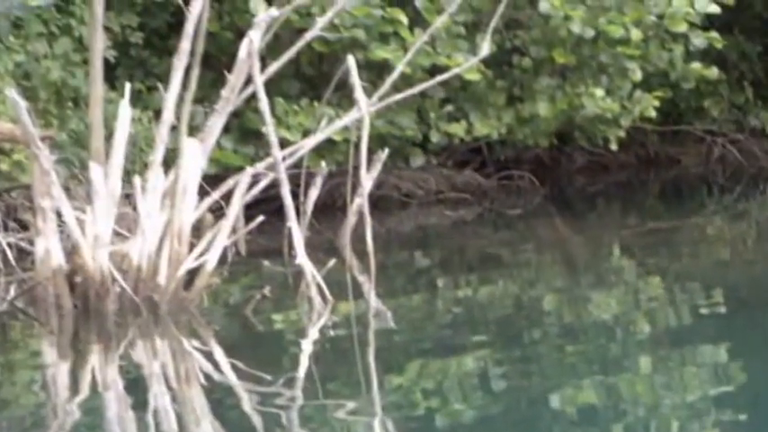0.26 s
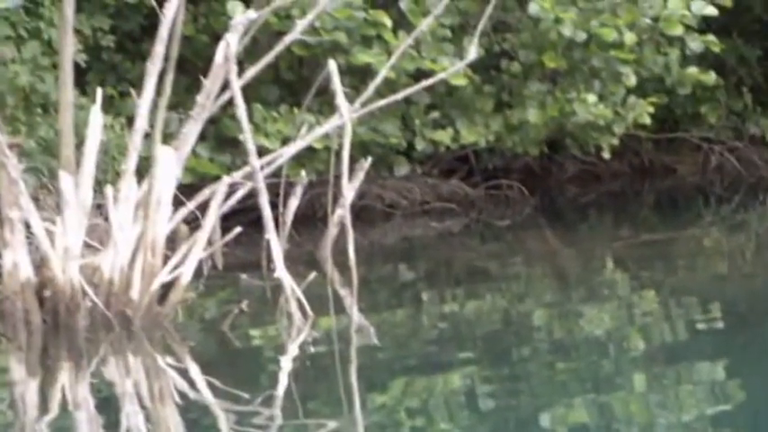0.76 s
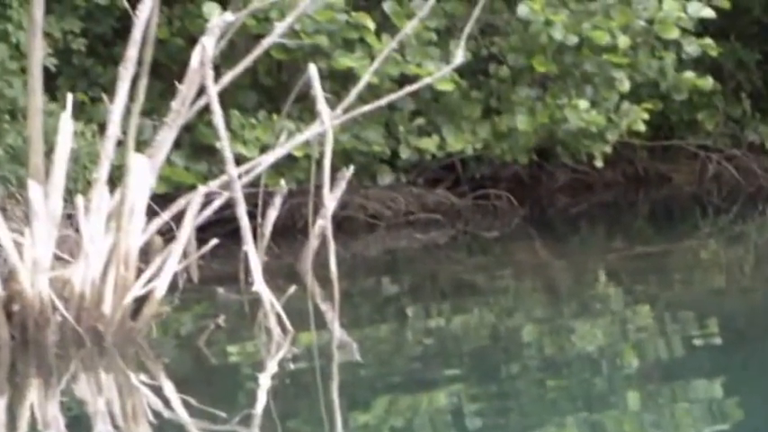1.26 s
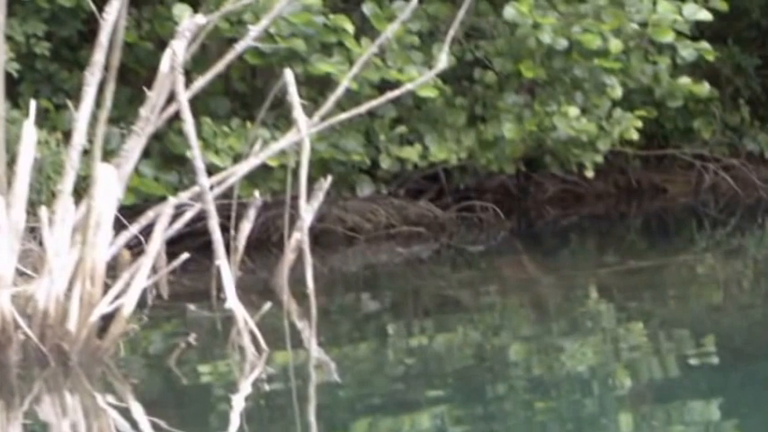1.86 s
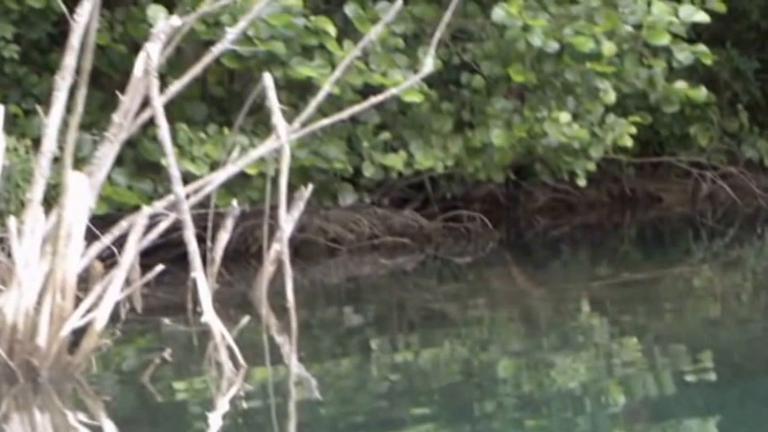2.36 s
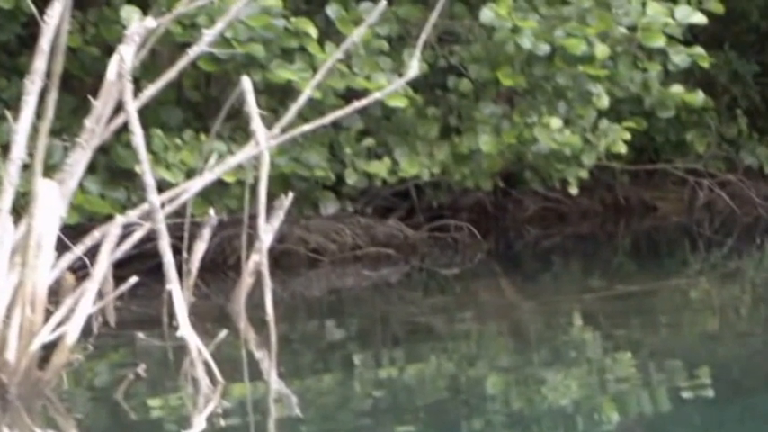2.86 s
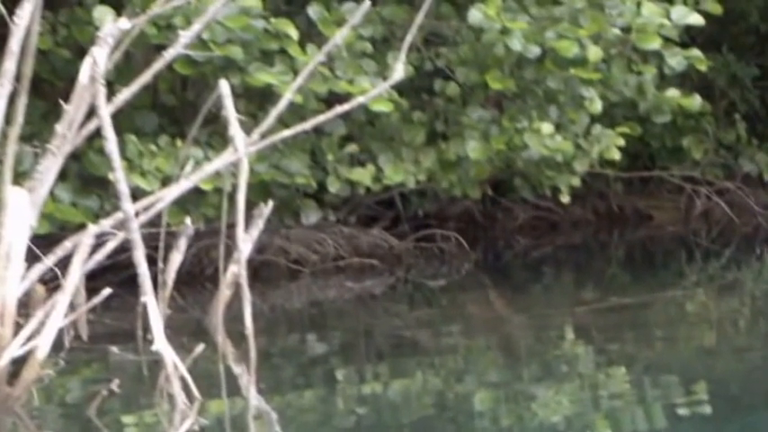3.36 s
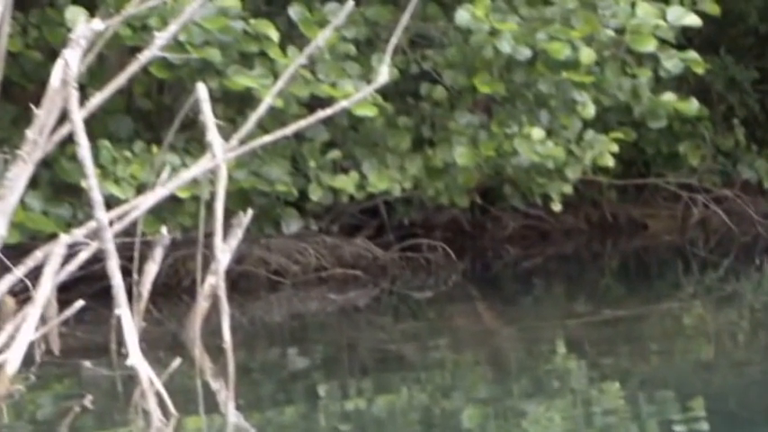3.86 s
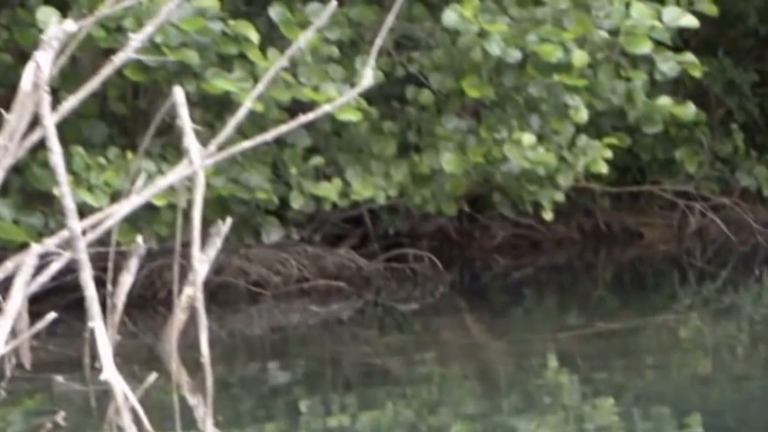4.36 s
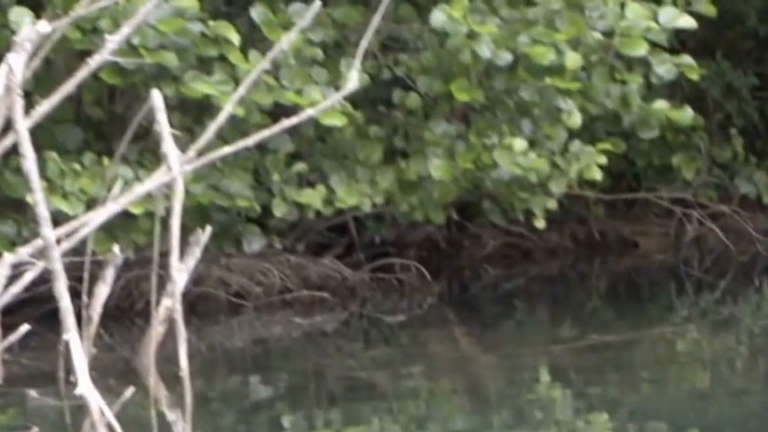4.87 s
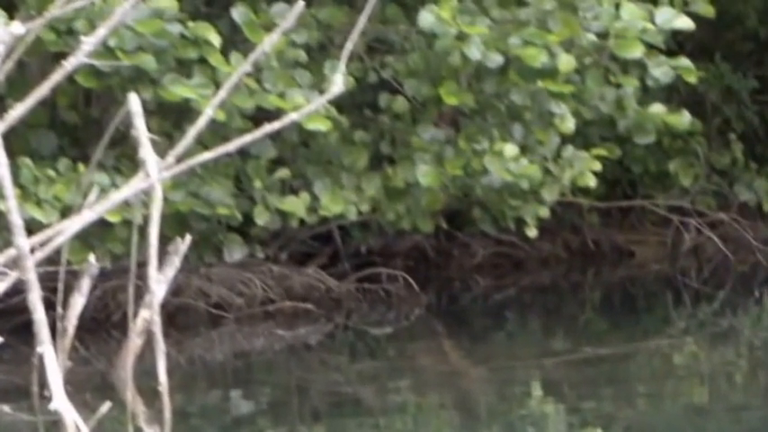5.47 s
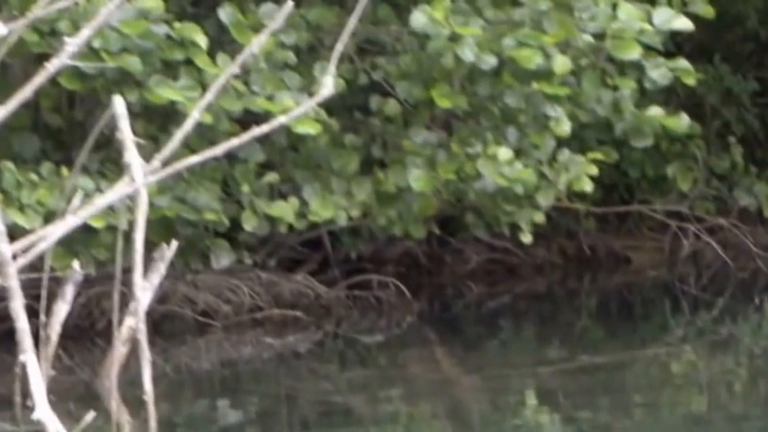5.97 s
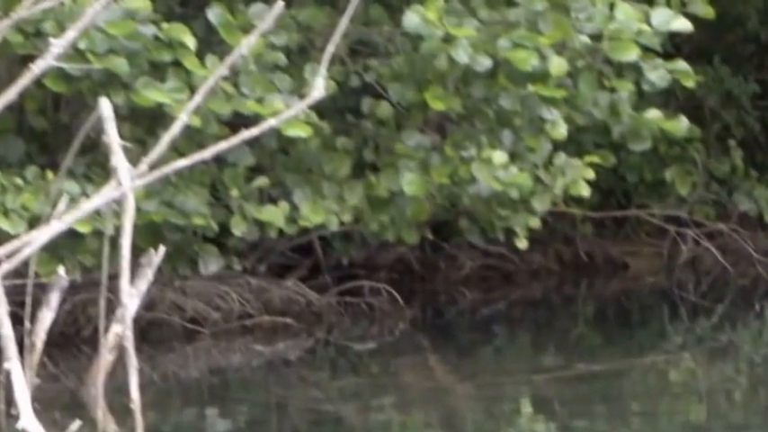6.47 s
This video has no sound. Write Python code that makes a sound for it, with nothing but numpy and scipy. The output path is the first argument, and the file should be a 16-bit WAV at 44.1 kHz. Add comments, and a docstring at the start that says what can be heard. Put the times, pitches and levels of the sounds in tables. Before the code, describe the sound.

Dry, pulsing frog trills over a farther chorus, joined by a loud bird whistle and then quick high twittering.

```python
"""Frogs trill on a calm wooded pond: runs of dry pulses, most swelling as they slow, over a farther chorus.
Each pulse is a snap of the larynx that excites damped resonances of the throat and the vocal sac.
Birds add the gliding tones of the syrinx: some flute far off, a near songbird whistles one loud phrase,
and a high-voiced bird calls, then repeats a twittered motif. The trees on the bank scatter the birds
and the near frogs back across the water; under it all lie quiet air and a faint hiss of leaves."""
import sys
import numpy as np
from scipy import signal
from scipy.fft import rfft, irfft, next_fast_len
from scipy.io import wavfile
from scipy.ndimage import uniform_filter1d, map_coordinates

SR = 44100
rng = np.random.default_rng(int(sys.argv[2]) if len(sys.argv) > 2 else 0)


def log_audio(samples):
    """Write samples as a 16-bit WAV file to the path given in sys.argv[1]."""
    # one column per channel
    frames = np.atleast_2d(samples).T
    # limit to full scale, then quantise
    limited = np.clip(frames, -1, 1)
    pcm = np.round(limited * 32767).astype(np.int16)
    wavfile.write(sys.argv[1], SR, pcm)


N = 296793
THROAT_GROWTH, SAC_GROWTH = 1.55, 1.0  # a longer gap builds a stronger pulse: dB of level per dB of gap
PULSE_SCATTER_DB, PULSE_SCATTER_HZ = 1.15, 35  # standard deviations from pulse to pulse


def amp(db):
    """Amplitude ratio of a level in decibels."""
    return 10 ** (np.asarray(db) / 20)


def along(points, hz):
    """Interpolation of (f/Hz, value) points on a logarithmic frequency axis."""
    f, value = np.transpose(points)
    return np.interp(np.log(hz + 1), np.log(f + 1), value)


def filtered(x, response):
    """Linear filtering: the spectrum is multiplied by a frequency response."""
    size = next_fast_len(N + 8192)
    return irfft(rfft(x, size) * response(np.fft.rfftfreq(size, 1 / SR)), size)[..., :N]


def wobble(rate, size=N):
    """Slow random modulation: a spline through `rate` Gaussian knots a second."""
    knots = rng.standard_normal(int(size * rate / SR) + 4)
    return map_coordinates(knots, [np.arange(size) * rate / SR])


def panned(pan_db):
    """Interaural level difference: left and right gains whose mean is 1."""
    gains = amp([[pan_db / 2], [-pan_db / 2]])
    return gains / gains.mean()


def add(track, s, sound):
    """Superposition: a stereo sound joins the track at s seconds."""
    i = round(s * SR)
    part = sound[:, max(-i, 0):max(N - i, 0)]
    track[:, max(i, 0):max(i, 0) + part.shape[1]] += part


def scattered(sound, wet_db, t60, onset_s, width):
    """Diffuse reflection: bank and trees follow the direct sound with an exponentially decaying tail."""
    t = np.arange(SR // 3) / SR
    build_up = 1 - np.exp(-(t / onset_s) ** 2)
    mid, side = rng.standard_normal((2, len(t))) * amp(-60 * t / t60) * build_up
    response = np.array([mid + width * side, mid - width * side])
    response *= amp(wet_db) / np.linalg.norm(response[0])
    response[:, 0] += 1  # direct path
    return signal.fftconvolve(sound[None], response, axes=1)


def diffuse_noise(spectrum):
    """Partly coherent stereo noise of rms 1, most alike at the two ears in the midrange."""
    # interaural coherence: f/Hz, correlation
    coherence = [(30, .25), (130, .45), (300, .9), (1400, .9), (2800, .6), (4500, .35), (8000, 0)]

    def response(hz):
        angle = np.arccos(np.clip(along(coherence, hz), -1, 1)) / 2
        return amp(along(spectrum, hz)) * [np.cos(angle), np.sin(angle)]

    mid, side = filtered(rng.standard_normal((2, N)), response)
    ears = np.array([mid + side, mid - side])
    return ears / np.sqrt(np.mean(ears ** 2) + 1e-20)


def air_and_leaves():
    """Ambient noise: steady broadband air and a slowly varying treble band from the leaves."""
    # spectra of open air and of leaf hiss: f/Hz, relative level/dB
    air_spectrum = [(20, 7.5), (45, -16), (65, -14.5), (110, -23.5), (250, -18.5), (450, -5.5), (850, -6.5),
                    (2000, -3.5), (4500, -18), (7000, -14.5), (10000, -17.5), (12000, -26.5)]
    leaf_spectrum = [(2500, -23), (3700, -3.5), (4600, -2), (5500, -6), (7000, -24)]
    # envelope of the hiss: t/s, level/dB
    leaf_envelope = [(0, -73), (.8, -65.5), (1.4, -64.5), (2.599, -65), (3.399, -72), (6.699, -69)]
    leaf_db = np.interp(np.arange(N) / SR, *np.transpose(leaf_envelope))
    leaves = amp(leaf_db) * diffuse_noise(leaf_spectrum)
    air = amp(-61.5) * diffuse_noise(air_spectrum)
    return (air + leaves) * panned(-2.4)


def syrinx(contour, buzz_db, waver, second_db, second_hz=6200, buzz_hz=165):
    """A tone along (t/s, f/Hz, level/dB) points; amplitude and frequency modulation roughen fast glides."""
    s, hz, db = np.transpose(contour)
    s = np.sort(s)
    t = np.arange(s[0], s[-1] + .00067, 1 / SR)
    pitch = uniform_filter1d(np.interp(t, s, hz), size=130)
    glide = np.gradient(np.log(pitch)) * SR
    rough = np.minimum((glide / 6) ** 2, 1)
    buzz = rough * (np.sin(2 * np.pi * buzz_hz * t + wobble(60, len(t))) + .5 * wobble(400, len(t)))
    pitch = pitch * (1 + waver * buzz)
    edges = np.sin(np.pi / 2 * np.clip(np.minimum(t - t[0], t[-1] - t) / .0015, 0, 1)) ** 2
    envelope = amp(uniform_filter1d(np.interp(t, s, db), size=90) + buzz_db * (buzz - rough / 2))
    # on high upward slurs the other side of the syrinx joins in, a little higher
    joins = np.exp(-((pitch - 5350) / 480) ** 2) * np.clip(glide, 0, 1)
    upper = second_hz + .8 * (pitch - 5350) + 130 * wobble(490, len(t))
    tone = lambda f: np.sin(2 * np.pi * np.cumsum(f) / SR)
    return edges * envelope * (tone(pitch) + amp(second_db) * joins * tone(upper))


def whistles(rows, attack_share=.12, release_share=.15, arch_db=2.5):
    """Note contours: a parabolic glide under an arched envelope; modulation makes high notes flutter."""
    flutter_from_hz, flutter_hz, flutter_db, flutter_bend = 3300, 55, .5, .008
    u = np.linspace(0, 1, 80)
    for s, length, *arc_hz, db, fade_db, pan_db in rows:
        hz = np.polyval(np.polyfit([0, .5, 1], arc_hz, 2), u)
        gate = np.clip(np.minimum(u / attack_share, np.sqrt((1 - u) / release_share)), .1, 1)
        depth = np.clip((hz - flutter_from_hz) / flutter_from_hz * 10, 0, 1)
        flutter = depth * np.sin(2 * np.pi * flutter_hz * u * length)
        level = db - fade_db * u - arch_db * (2 * u - 1) ** 2 + flutter_db * flutter + 20 * np.log10(gate)
        yield pan_db, np.transpose([s + u * length, hz * (1 + flutter_bend * flutter), level])


def bird(notes, gain_db, wet_db, t60, buzz_db=0, waver=0, second_db=-120):
    """A source among scatterers: each note arrives directly and by way of the trees."""
    out = np.zeros((2, N))
    for pan_db, contour in notes:
        whistle = amp(gain_db) * syrinx(contour, buzz_db, waver, second_db)
        heard = scattered(whistle, wet_db, t60, onset_s=.011, width=1.1)
        add(out, contour[0][0], panned(pan_db) * heard)
    return out


def far_birds():
    """Faint fluted notes: at a distance, scattered sound is a large share of what arrives."""
    # notes: t/s, length/s, first f/Hz, middle f/Hz, last f/Hz, relative level/dB, fade/dB, L-R/dB
    notes = [ (.614, 0.015, 2180, 2220, 2330, -52, -2, -2), (.845, 0.031, 2420, 2210, 2040, -50, 4, -2),
             (.885, 0.024, 1660, 1660, 1640, -51.5, -3, -2), (.925, 0.033, 1787, 1721, 1680, -47, 4, -7),
             (1.13, 0.03, 2600, 2360, 2150, -46.5, 3, -6), (1.2, 0.11, 2180, 1970, 1900, -48.5, 8, -8),
             (1.302, .15, 2340, 2116, 1975, -45.5, 13, -6), (1.635, 0.032, 2072, 2040, 2050, -51, 8, -4),
             (2.09, .07, 2100, 2040, 1990, -56.5, 5, -1), (2.98, 0.0911, 4700, 4760, 4706, -56, 12, 7),
             (4.04, .11, 2245, 2090, 1880, -49, 6, 0), (6.655, 0.073, 1715, 1660, 1600, -53, -5, 0)]
    return bird(whistles(notes), gain_db=4, wet_db=-6, t60=.21)


def damped_mode(t, hz, life_s, sag, order=3):
    """A damped resonance whose envelope peaks at t = 0 while its pitch sags through hz."""
    u = np.maximum(1 + t / (order * life_s), 0)
    cycles = hz * (t - sag * life_s * np.sqrt(1 + (t / life_s) ** 2))
    return (u * np.exp(1 - u)) ** order * np.sin(2 * np.pi * (cycles + rng.random()))


def frog_pulse(throat_db, sac_db, sac_hz, throat_hz=1390, snap_db=-28, overtone_db=-27):
    """Impulse excitation: one snap of the larynx rings throat and vocal sac, peaking 10 ms in."""
    t = np.arange(-(SR // 100), SR // 60) / SR
    drift = np.exp(.02 * rng.standard_normal(3))
    throat = amp(throat_db) * damped_mode(t, throat_hz * drift[0], life_s=.00077, sag=.05)
    sac = damped_mode(t, sac_hz, life_s=.00088 * drift[1] ** 8, sag=.025)
    overtone = amp(overtone_db) * damped_mode(t, 4420 * drift[2] ** 2, life_s=.0006, sag=.02)
    snap = amp(snap_db + throat_db) * damped_mode(t, 2500, life_s=.0001, sag=0)
    return throat + amp(sac_db) * (sac + overtone) + snap


def trill(length, first_gap, gap_ratio, longest_gap, sac_rise_hz=187):
    """A pulse train with capped geometric gaps, scaled to its length: delay/s, effort/dB, detuning/Hz."""
    gaps = np.minimum(first_gap * gap_ratio ** np.arange(20), longest_gap)
    delays = np.cumsum(gaps) - gaps
    sung = delays < length + gaps / 2
    progress = delays[sung] / delays[sung][-1]
    effort_db = 20 * np.log10(gaps[sung] / longest_gap)
    detune_hz = sac_rise_hz * (progress - 1)  # the sac tightens through a trill
    return np.transpose([length * progress, effort_db, detune_hz])


def far_frogs(count=56, base_db=-41, spread_db=1.5, throat_db=-11, sac_hz=2920, sac_range=.066):
    """Incoherent summation: trills of frogs of many sizes overlap, and the farthest blur into noise."""
    # spectrum of the blurred chorus: f/Hz, relative level/dB
    chorus_spectrum = [(530, -71), (900, -44), (1010, -15), (1200, -4.5), (1360, -2), (1880, -10),
                       (2270, -12), (2380, -6.5), (2620, -1), (2800, 0.5), (3080, -4.5), (3490, -22),
                       (4000, -28.5), (5200, -60.5), (8800, -120)]
    # swell of the chorus: t/s, relative level/dB
    chorus_envelope = [(0, 4.5), (.9, 2.5), (1.6, 3.5), (1.85, 2), (2.3, 2.5), (3, 3), (3.8, 3), (4.1, 3.5),
                       (4.6, 1.5), (5.1, 4.5), (5.8, 2), (6.7, 3.5)]
    swell_db = lambda s: np.interp(s, *np.transpose(chorus_envelope))
    out = np.zeros((2, N))
    starts = (np.arange(count) + rng.random(count)) / count * (N / SR + .5) - .5
    for start, (size, pitch, throat, side, pace) in zip(starts, rng.standard_normal((count, 5))):
        frog_hz = sac_hz * np.exp(sac_range * np.tanh(pitch))
        frog_db = base_db + spread_db * np.tanh(size)
        first_gap, longest_gap = .031 * np.exp(.15 * pace), .049 * np.exp(.06 * pace)
        for delay, effort_db, detune_hz in trill(.4, first_gap, 1.07, longest_gap):
            s = start + delay
            db = frog_db + SAC_GROWTH * effort_db + swell_db(s) + rng.normal(0, PULSE_SCATTER_DB)
            hz = frog_hz + detune_hz + rng.normal(0, PULSE_SCATTER_HZ)
            pulse = frog_pulse(db + throat_db + 2 * np.tanh(throat), db, hz)
            # a frog off to one side reaches that ear a little sooner
            ears = np.array([pulse, np.roll(pulse, round(2 * side))])
            add(out, s, panned(4 * side - .8) * ears)
    blur_db = -53.5 + swell_db(np.arange(N) / SR) + wobble(25)
    return out + amp(blur_db) * diffuse_noise(chorus_spectrum)


def twittering_bird():
    """Rapid frequency sweeps in a high voice: single calls, then a repeated motif."""
    # contour of each named syllable: t/s from its start, f/Hz, relative level/dB
    syllables = { "chip": [(0, 3170, -10.5), (.009, 5050, -4.5), (.026, 5700, -2), (.045, 6090, -13)],
                 "tick": [(0, 2555, -5.5), (.015, 3570, 0.5), (.023, 4650, -20), (.03, 3189, 5)],
                 "peak": [(0, 4400, -13), (.015, 4860, -8.5), (.029, 5300, -6), (.046, 6420, -14.5),
                 (.057, 4620, -4), (.068, 4200, -13.5), (.079, 3580, -1.5), (.093, 2850, -10.5)],
                 "slur": [(0, 4326, -12.5), (.019, 5105, 3), (.038, 5710, -9.5)], "fall": [(0, 4850, -28),
                 (.025, 4500, -5.5), (.042, 4300, -11), (.06, 4050, -10.5), (.077, 3520, 1.5),
                 (.09, 3000, -4.5), (.11, 2600, -22)], "lash": [(0, 3640, -10), (.008, 6520, -23.5),
                 (.028, 4850, -2), (.036, 3840, -16.5), (.048, 3270, -1), (.07, 2730, -18)]}
    # calls and song: t/s, syllable, relative level/dB, L-R/dB
    song = [ (-.035, "chip", -48, 12), (.755, "chip", -41, 8), (2.325, "chip", -45.5, 17),
            (2.966, "chip", -39, 9), (4.19, "chip", -37.5, 10), (4.889, "peak", -48.5, -4.5),
            (5.034, "tick", -40.5, -4), (5.076, "peak", -34.5, 3.5), (5.169, "slur", -42, -4.5),
            (5.263, "fall", -30.5, -4), (5.372, "lash", -27, -5.5), (5.503, "tick", -30, -4),
            (5.545, "peak", -27, -5.5), (5.642, "slur", -32.5, -4.5), (5.738, "fall", -24, -4),
            (5.851, "lash", -25.5, -4.5), (5.982, "tick", -28.5, -3.5), (6.027, "peak", -24.5, -4.5),
            (6.126, "slur", -33.5, 3)]
    notes = [(pan_db, np.array(syllables[name]) + [s, 0, db]) for s, name, db, pan_db in song]
    return bird(notes, gain_db=-1.34, wet_db=-3, t60=.17, buzz_db=1.5, waver=.019, second_db=-12.5)


def near_songbird():
    """One loud whistled phrase, so close that the direct sound dominates."""
    # notes: t/s, length/s, first f/Hz, middle f/Hz, last f/Hz, level/dB, fade/dB, L-R/dB
    phrase = [ (2.516, 0.017, 3060, 3100, 3270, -30.5, 8, 6.5),
              (2.531, 0.012, 3330, 3230, 3260, -27.5, -3.5, 4),
              (2.553, 0.037, 3280, 3340, 3450, -31, 11, 3), (2.6, .088, 3570, 3580, 3470, -47.5, -8, 14),
              (2.695, 0.048, 3440, 3430, 3390, -40.5, 3, 6.5),
              (3.144, 0.13, 3034, 2950, 2870, -25, 9.5, 6.5),
              (3.328, 0.018, 4390, 3790, 3300, -43.5, -7, 6),
              (3.346, 0.013, 3350, 3140, 3000, -20.5, 1.5, 5.5),
              (3.359, .031, 2950, 2315, 2060, -24, 2, 2.5),
              (3.398, 0.056, 4042, 3872, 3790, -40.5, -3.5, 7),
              (3.515, 0.045, 1925, 2108, 1840, -19, -4.5, 2.5), (3.572, .03, 1460, 1416, 1655, -30, 2, 4.5),
              (3.597, 0.019, 2350, 2410, 2540, -30, 2, 1.5),
              (3.616, .019, 3223, 3133, 3040, -23.5, -2.5, 5), (3.643, 0.025, 3900, 4070, 3480, -47, 3, 4),
              (3.667, 0.022, 2570, 2437, 2343, -24.5, 4, 2.5),
              (3.741, 0.15, 2097, 1981, 1943, -11.5, 2, -2.4)]
    return bird(whistles(phrase), gain_db=0, wet_db=-35, t60=.2, buzz_db=3, waver=.022)


def near_frogs():
    """Pulse trains from frogs along the bank, each pulse trailed by weak diffuse reflections."""
    # trills: first pulse t/s, last pulse t/s, nominal first gap/s, gap ratio, nominal longest gap/s,
    # throat level/dB and sac level/dB at full effort, final sac f/Hz, L-R/dB
    trills = [ (0.025, .079, 0.059, 0.64, 0.051, -30.5, -31.5, 2810, 4),
              (.123, .474, .037, 1.056, .048, -35.5, -33, 2830, 2),
              (.591, 0.778, .0606, 0.99, 0.053, -42, -33, 2890, -5),
              (.81, 1.064, 0.038, 1.04, 0.05, -37, -33, 3086, 6),
              (1.063, 1.552, .0258, 1.084, .054, -27, -29.3, 2860, 2),
              (1.22, 1.59, .0404, 1.054, .049, -46, -31.5, 2840, -4),
              (1.998, 2.3, .0374, 1.09, .045, -36.5, -34, 3070, 4),
              (2.376, 2.955, .0264, 1.06, .046, -34.5, -36.5, 2860, -3),
              (3.051, 3.563, .0242, 1.082, .053, -29.3, -29, 2850, 3),
              (3.445, 3.626, .043, 1.03, .048, -40.5, -32.5, 2780, -11),
              (3.658, 3.816, .044, 0.91, 0.037, -39, -30.5, 2910, -9),
              (3.672, 3.857, .045, 1.03, .048, -38.5, -34, 3076, 4.5),
              (4.192, 4.376, 0.042, 1.05, .052, -41, -35, 3020, -15),
              (4.679, 4.929, .0364, 0.98, 0.05, -36.5, -40.5, 3068, 4),
              (5.01, 5.495, .0254, 1.084, .055, -29.3, -28.5, 2900, 3),
              (5.676, 5.866, 0.058, 1.05, 0.042, -43, -33.5, 2900, -8.5),
              (5.883, 6.138, 0.037, 0.98, 0.043, -40.5, -31.5, 3010, 0),
              (6.175, 6.491, 0.039, 1.074, 0.05, -39, -29.5, 2845, -6),
              (6.337, 6.539, 0.05, 1.11, .051, -39.5, -34.5, 2956, -6),
              (6.488, 6.694, 0.034, 1.062, 0.047, -35.5, -32.5, 2914, 1.5)]
    out = np.zeros((2, N))
    for start, end, first_gap, gap_ratio, longest_gap, throat_db, sac_db, sac_hz, pan_db in trills:
        for delay, effort_db, detune_hz in trill(end - start, first_gap, gap_ratio, longest_gap):
            throat_scatter, sac_scatter, pan_scatter = PULSE_SCATTER_DB * rng.standard_normal(3)
            pulse = frog_pulse(throat_db + THROAT_GROWTH * effort_db + throat_scatter,
                               sac_db + SAC_GROWTH * effort_db + sac_scatter,
                               sac_hz + detune_hz + rng.normal(0, PULSE_SCATTER_HZ))
            heard = scattered(pulse, wet_db=-9, t60=.06, onset_s=.004, width=1.2)
            add(out, start + delay - .01, panned(pan_db + 2 * pan_scatter) * heard)
    return out


def scene():
    """Superposition of birds, frogs and the air over the pond."""
    birds = near_songbird() + twittering_bird() + far_birds()
    return birds + near_frogs() + far_frogs() + air_and_leaves()


def record(dry):
    """Band limiting: a steep low-pass filter removes the highest treble."""
    cutoff_hz = 12150
    return filtered(dry, lambda hz: 1 / (1 + (hz / cutoff_hz) ** 200))


dry = scene()
out = record(dry)
log_audio(out)
```